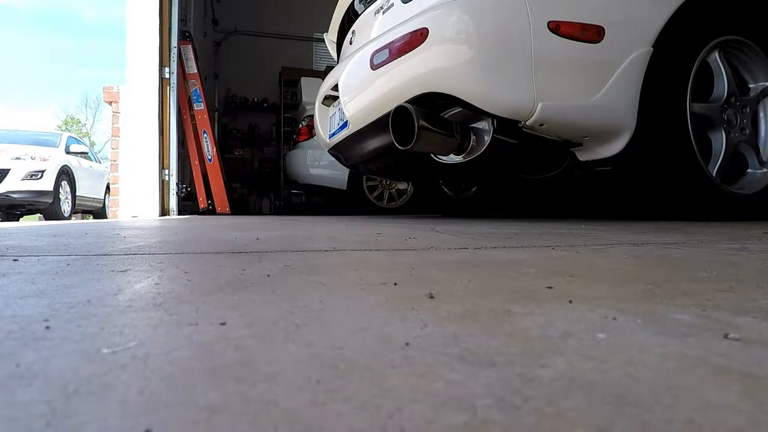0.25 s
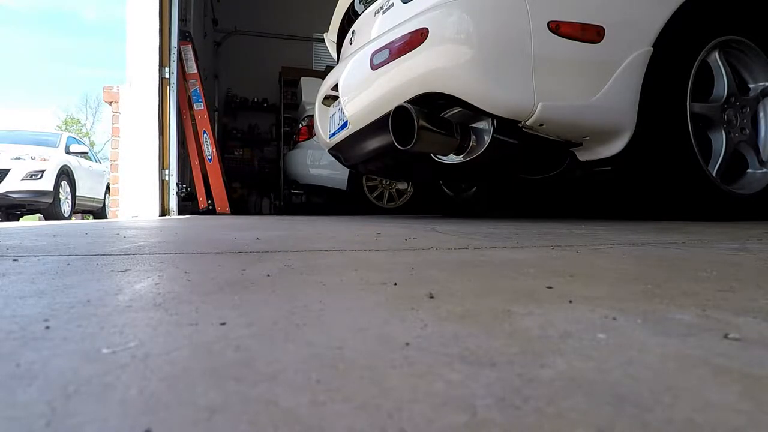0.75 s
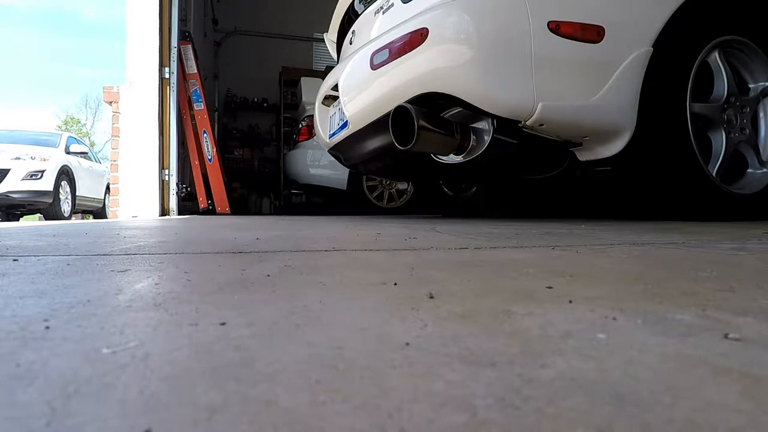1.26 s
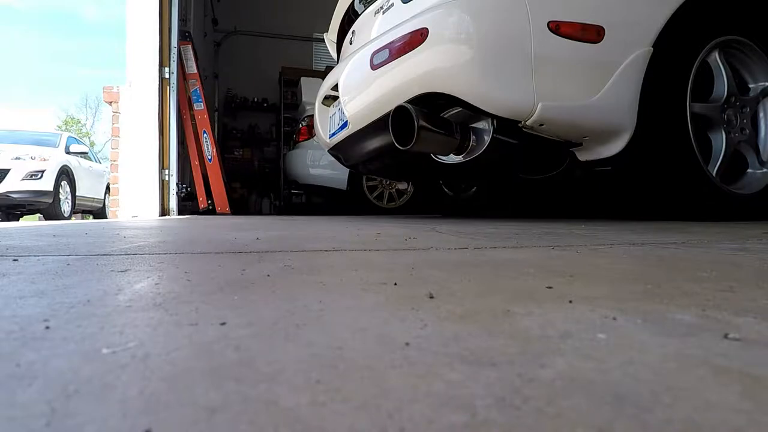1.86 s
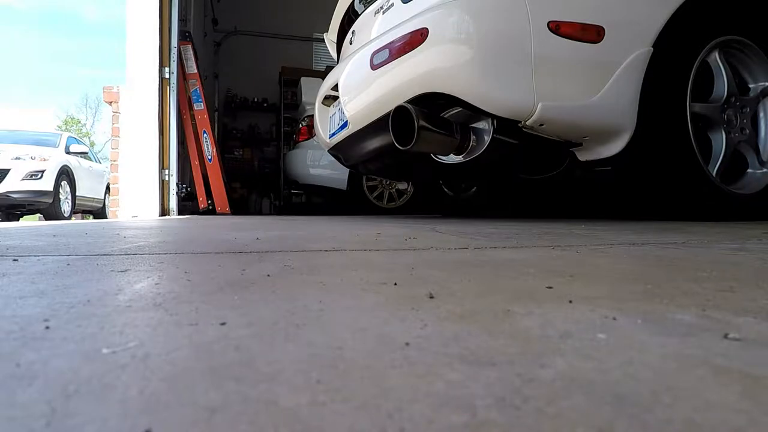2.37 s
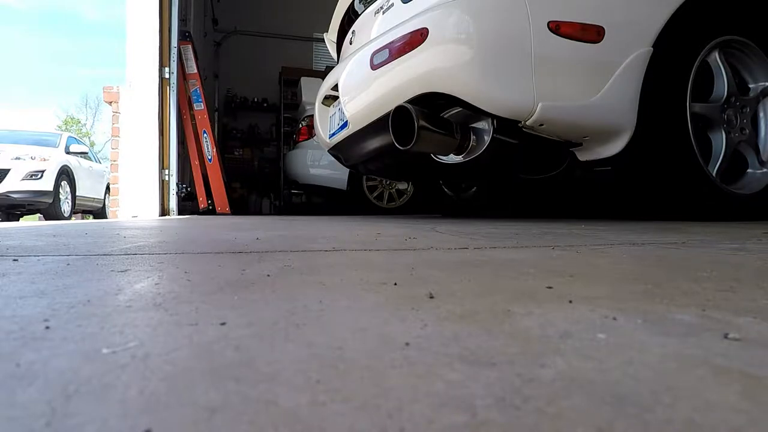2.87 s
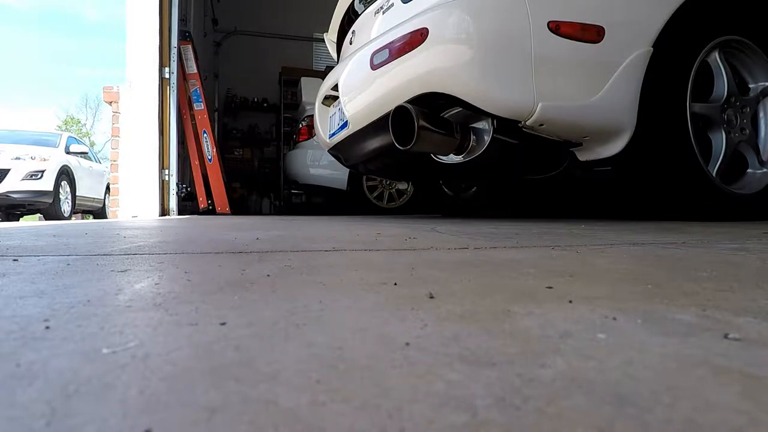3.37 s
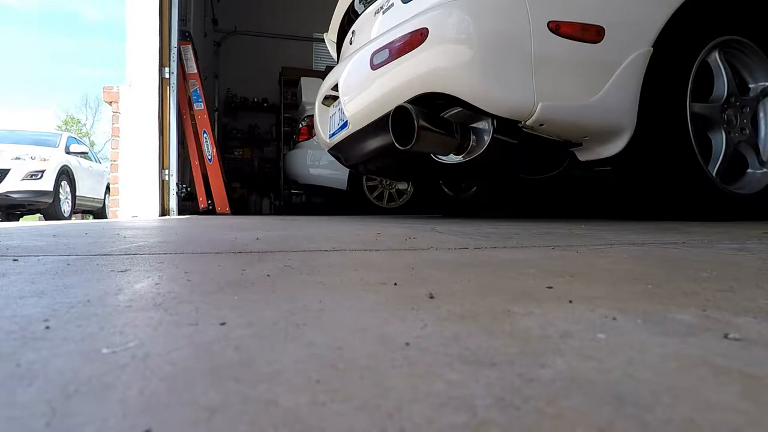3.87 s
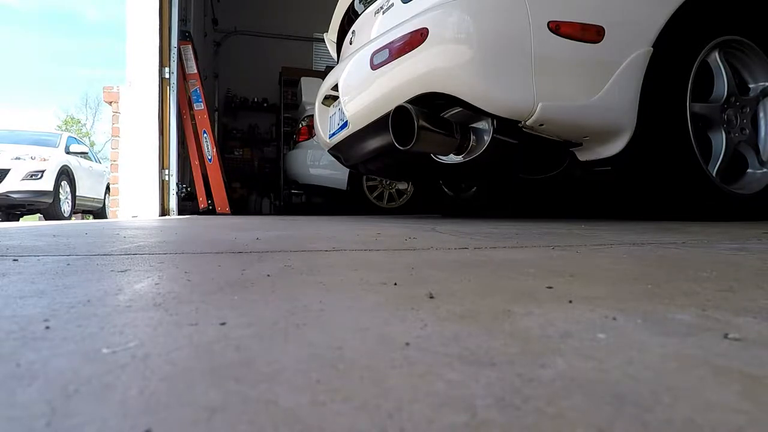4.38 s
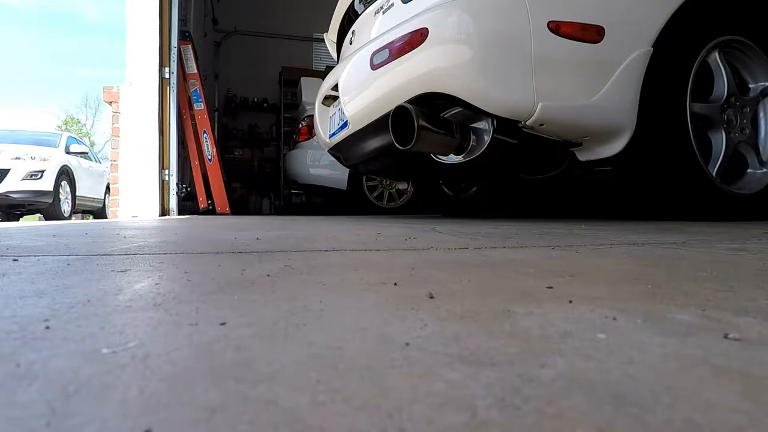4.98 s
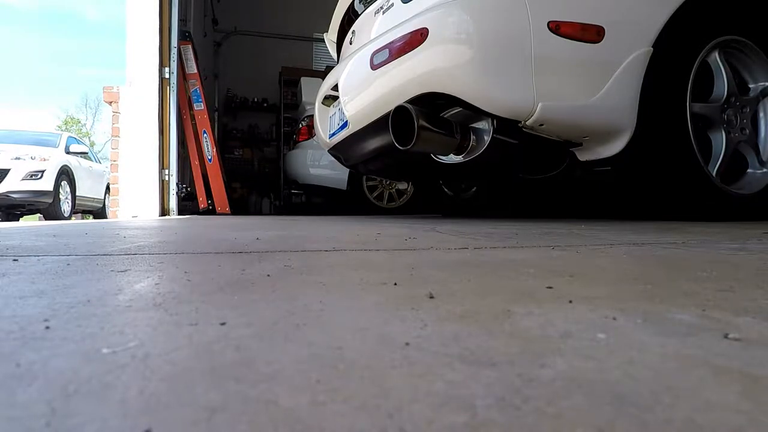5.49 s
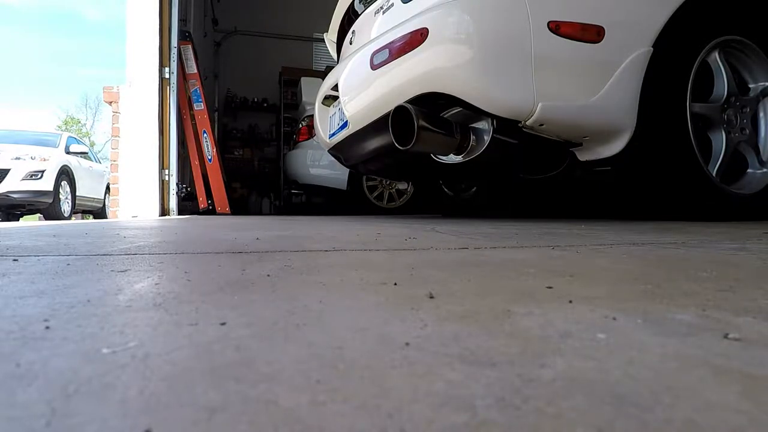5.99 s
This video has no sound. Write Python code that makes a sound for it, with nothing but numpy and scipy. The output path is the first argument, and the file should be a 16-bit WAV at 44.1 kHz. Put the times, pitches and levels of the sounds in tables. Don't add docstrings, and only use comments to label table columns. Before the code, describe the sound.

Low microphone behind a car exhaust inside a garage: bassy, loping idle with soft gas hiss above. Two short revs swell into a faster buzzing drone, each dropping away in sputtering, hollow burbles as fuel cuts. Small pops follow the first; the second, stronger rev breaks into a hard backfire crack and a deep thump before rough idle returns. Close, loud, lightly echoing.

```python
import sys
import numpy as np
from scipy import signal
from scipy.fft import rfft, irfft
from scipy.io import wavfile
from scipy.ndimage import uniform_filter1d

SR = 44100
rng = np.random.default_rng(int(sys.argv[2]) if len(sys.argv) > 2 else 0)


def transcribe(signal):
    frames = np.atleast_2d(signal).T
    limited = np.clip(frames, -1, 1)
    pcm = np.round(limited * 32767).astype(np.int16)
    wavfile.write(sys.argv[1], SR, pcm)


def elevation(decibels):
    levels = np.asarray(decibels, float)
    return 10 ** (levels / 20)


N = 275184
LEAD_IN = 8192
IDLE_HZ = 47.5

# time in seconds, firings per second.
FIRING_RATE = [(0, 43.3), (.43, 44), (.69, 67.6), (1.0, 82.2), (1.57, 61.5), (1.77, 59.8), (2.1, 50.8),
               (2.75, 45.2), (3.76, 43), (4.19, 69.6), (4.5, 86.2), (4.74, 92), (4.85, 80.5), (5.11, 77.6),
               (5.33, 62.3), (5.5, 59.6), (5.68, 52.2), (6.24, 46.5)]
# time in seconds, exhaust level in dB, gas flow level in dB.
FLOW = [(0.0, -13, -44.5), (0.42, -15, -43), (0.62, -11.5, -41), (0.9, -13.5, -40.5), (1.27, -13.5, -37.5),
        (1.6, -12, -40.5), (2.1, -15, -46), (2.9, -15.5, -45.5), (3.72, -14.5, -44.5), (4.08, -12.5, -41.5),
        (4.3, -13, -40.5), (4.7, -15, -36), (4.9, -11, -37), (5.08, -18, -39.5), (5.27, -17.5, -45.5),
        (5.55, -15, -46.5), (5.9, -17, -47.5), (6.24, -16, -45.5)]
# time in seconds, depth in dB, length in ms.
MISFIRES = [(0.743, -1.5, 10), (1.096, -20, 33), (1.15, -5, 12), (1.227, -6, 70), (1.283, -12.5, 13),
            (1.401, -2.5, 95), (1.456, 0, 15), (1.652, -9.5, 13), (1.981, -7.5, 11), (2.074, -1, 24.6),
            (2.449, -5.5, 24), (2.516, -14.5, 3.9), (2.647, 1, 44), (3.223, -17, 39), (4.329, -1.5, 31),
            (4.564, -12.5, 16), (4.88, -6.5, 60), (4.997, -3, 110), (5.086, -8, 6.7), (5.57, -1, 12),
            (5.718, -2, 26), (5.989, -5, 14), (6.125, -1.5, 61)]
# time in seconds, peak in dB, push in Hz (its
# sign is the # polarity), crack level in dB.
POPS = [
    (.001, -6, 260, -60),
    (.787, -12, 130, -29),
    (1.126, -6, -100, -20.5),
    (1.996, -7, -150, -31),
    (4.8334, 2, 260, -9),
    (4.895, -17, 200, -33),
    (4.9495, -.5, -105, -24),
]
# start in seconds, end in seconds, length of the first stutter in seconds.
FUEL_CUTS = [
    (1.029, 2.145, .42),
    (4.774, 5.577, 0.35),
]
# time in seconds, length in seconds, share that burns 0-1.
RELIGHTS = [
    (1.12, 0.06, 1),
    (1.25, 0.07, 0.7),
    (1.43, .05, 1),
    (1.68, 0.071, 1),
    (1.86, 0.042, 1),
    (2.0, 0.068, 1),
    (4.97, 0.1, 0.9),
    (5.42, 0.064, 0.98),
]
# time in seconds, length in seconds, added unevenness 0-1.
STUMBLES = [
    (.2, .12, .13),
    (.79, .04, .3),
    (1.95, .15, .3),
    (2.3, .2, .17),
    (2.76, .14, .33),
    (3.45, .12, .13),
    (4.35, .1, .18),
    (5.77, .15, .33),
    (6.2, .08, .2),
]
# frequency in Hz, level in dB.
PUFF_SPECTRUM = [(12, -65.5), (20, -32), (38, 15), (48, 11.5), (65, 12), (97, 13.5), (126, 14.5),
                 (150, -15.5), (200, -58), (330, -120)]
# frequency in Hz, level in dB.
FRONT_SPECTRUM = [(76, -23), (130, 4), (151, -1), (205, 7.5), (242, -3), (280, 2), (311, -0.5), (361, -23),
                  (398, -25), (440, -30), (475, -20), (524, -34), (700, -33), (910, -58.5), (1540, -120)]
# frequency in Hz, level in dB per Hz.
ROAR_SPECTRUM = [(250, -32), (420, 3.5), (439, -9.5), (541, -6.5), (605, -7), (667, -9.5), (724, -11),
                 (1120, -12), (1610, -12.5), (2500, -26), (3250, -47.5), (5500, -120)]
# frequency in Hz, level in dB per Hz.
HISS_SPECTRUM = [(1180, -4), (2000, -4.5), (2620, -3), (3070, -7.5), (5670, -7.5), (7590, -2.5),
                 (8270, -9.5), (9810, -15.5), (11000, -26), (14300, -46), (22000, -120)]
# frequency in Hz, level in dB per Hz.
AIR_SPECTRUM = [(6000, -18.5), (10200, -2.5), (11500, -8.5), (13400, -8.5), (14200, -14), (14800, -24)]
# frequency in Hz, level in dB per Hz.
CRACK_SPECTRUM = [(240, -16), (370, -3), (780, -7), (1490, -15), (2440, -17), (3230, -27), (3560, -25),
                  (4920, -27), (5430, -31), (7100, -31), (13000, -53)]
# frequency in Hz, width in Hz, level in dB.
SHELL_MODES = [(405.7, 32.4, 3.5), (457.2, 27, -1), (514.7, 18, -6.5), (600, 11, -7.5), (746, 24, -11.5),
               (1580, 38, -20.5)]
# frequency in Hz, likeness -1 to 1.
PORT_LIKENESS = [(60, 0.99), (130, 0.99), (290, 0.99), (630, 0.81), (1370, 0.17), (3010, 0.35),
                 (6570, 0.01), (14400, -0.05)]
# frequency in Hz, left over right in dB.
PORT_LEAN = [(60, 0.0), (150, -0.5), (370, -0.5), (930, -5.5), (2320, -3.0), (5770, -2.5), (14400, -1.5)]
# frequency in Hz, lead in radians.
PORT_LEAD = [(0, 0), (690, -0.2), (1210, 1.4), (2070, 1.2), (3450, 0.1), (11000, -3.9), (13600, 5.9),
             (14600, 7.1)]
LUCK = np.clip(rng.standard_normal((700, 3)), -2, 2)


def evened(x, span_s=None):
    power = np.mean(x ** 2) if span_s is None else uniform_filter1d(x ** 2, int(span_s * SR), mode="reflect")
    return x / np.sqrt(abs(power) + 1e-20)


def read(points, hz):
    f, value = np.transpose(points)
    return np.interp(np.log(hz + 1), np.log(f + 1), value)


def curves(rows):
    s, *columns = np.transpose(rows)
    return [np.interp(np.arange(N) / SR, s, c) for c in columns]


def bumps(rows):
    t = np.arange(0, N + 64, 64) / SR
    coarse = sum(height * np.exp(-((t - s) / length) ** 2) for s, length, height in rows)
    return np.interp(np.arange(N) / SR, t, coarse)


def with_lead_in(x):
    return np.pad(x, (LEAD_IN, 0), "edge")


def flickering(x, span):
    return evened(uniform_filter1d(uniform_filter1d(x, span), span))


def coloured(x, points, size=16384):
    level_db = read(points, abs(np.fft.fftfreq(size, 1 / SR)))
    log_gain = np.log(elevation(np.maximum(level_db, -100)))
    taps = np.fft.ifft(np.exp(np.conj(signal.hilbert(log_gain)))).real[:size // 2]
    return signal.oaconvolve(x, taps)[:len(x)]


def resonate(x, hz, *widths):
    turn = np.exp(2j * np.pi * np.cumsum(hz * np.ones(len(x))) / SR)
    for width in widths:
        r = np.exp(-np.pi * width / SR)
        x = 2 * (turn * signal.lfilter([1 - r], [1, -r], x / turn)).real
    return x


def ports(x, other):
    hz = np.fft.rfftfreq(N, 1 / SR)
    same = np.clip(read(PORT_LIKENESS, hz), 0, 1)
    lean = elevation(read(PORT_LEAN, hz) / 2)
    turn = np.exp(.5j * read(PORT_LEAD, hz))
    a, b = rfft(x), rfft(other)
    left = a * lean * turn
    right = (same * a + np.sqrt(1 - same ** 2) * b) / lean / turn
    return irfft(np.array([left, right]), N)


def eased(x):
    return uniform_filter1d(x * 1., int(.04 * SR), mode="nearest")


def running():
    t, hz = np.arange(N) / SR, curves(FIRING_RATE)[0]
    throttle = eased(np.clip(np.gradient(hz) * SR / 88, 0, 1))
    cut = sum(eased((t > a) & (t < b)) for a, b, _ in FUEL_CUTS)
    stutter = sum(eased((t > a + .04) & (t < a + s)) for a, _, s in FUEL_CUTS)
    burning = np.clip(1 - cut * (1 - bumps(RELIGHTS)), 0, 1)
    idle, wide_open = .25, .09
    uneven = idle + (wide_open - idle) * throttle
    uneven = (1 - cut) * uneven + .1 * cut + .52 * stutter + bumps(STUMBLES)
    fast = .84 * np.clip((hz - 62) / (79 - 62), 0, 1)
    pumping = np.clip(burning * fast + (1 - burning), 0, 1)
    return throttle, burning, uneven, pumping


def firings(own, spread_db):
    hz, uneven = with_lead_in(curves(FIRING_RATE)[0]), with_lead_in(running()[2])
    turns = np.cumsum(hz) / SR
    k = np.arange(1, int(turns[-1]))
    timing, strength, apart = LUCK[k].T
    sample = np.arange(len(hz))
    at = np.interp(k, turns, sample).astype(int)
    uneven = np.clip(uneven[at], 0, 1)
    late = uneven * (.1 * timing + .22 * own * apart)
    at = np.interp(k + late, turns, sample).astype(int)
    burn = np.minimum(np.sqrt(1 - own ** 2) * strength + own * apart, .4)
    swing_db = (.6 + .1351 * (hz[at] - IDLE_HZ)) * (-1.) ** k
    clicks = np.zeros(len(hz))
    clicks[at] = elevation(swing_db + spread_db * uneven * burn)
    return clicks


def puffs(eddies):
    *_, uneven, pumping = running()
    hz = curves(FIRING_RATE)[0]
    boom = coloured(firings(own=.85, spread_db=9) + .6 * eddies, PUFF_SPECTRUM)
    boom = -np.roll(boom, int(-.0024 * SR))[LEAD_IN:]
    hum = evened(resonate(boom, hz, 107, 58), span_s=.53)
    surge = evened(resonate(rng.standard_normal(N), .9 * hz, 14, 28))
    mix = (1 - pumping) * evened(boom, span_s=.052) + pumping * hum + 1.7 * uneven ** 2 * surge
    return evened(mix, span_s=.44)


def fronts(eddies):
    burning = running()[1]
    sharp = coloured(firings(own=.1, spread_db=13) + eddies, FRONT_SPECTRUM)
    sharp = evened(sharp, span_s=.12)[LEAD_IN:]
    dull = evened(resonate(sharp, 179.6, 127, 127), span_s=.28)
    return sharp + .6 * (1 - burning) * (dull - sharp)


def exhaust():
    throttle, burning, uneven, _ = running()
    puff_db = curves(FLOW)[0]
    front_db = puff_db - 4 + throttle - 8 * (1 - burning)
    gaps = [(s, .0004 * ms, np.clip(2.15 * db, -12, 0)) for s, db, ms in MISFIRES]
    stalls = [(s, .009, -9) for s, *_ in POPS]
    hole_db = bumps(gaps + stalls)
    eddies = .03 * with_lead_in(uneven) * rng.standard_normal(N + LEAD_IN)
    pipe = elevation(puff_db + hole_db + 1.5) * puffs(eddies) + elevation(front_db + .38 * hole_db) * fronts(eddies)
    pipe = pipe + elevation(-17.5) * np.roll(pipe, int(.01151 * SR))
    wall = elevation(-22.5) * signal.hilbert(np.roll(pipe, int(.02966 * SR))).imag
    return np.array([pipe * elevation(1.48) + wall, pipe * elevation(1.73) - wall])


def rasp():
    throttle, burning, *_ = running()
    clicks = firings(own=.35, spread_db=14.5)[LEAD_IN:]
    ring = 0
    for hz, width, db in SHELL_MODES:
        tilt_db = 10 * throttle * np.clip(np.log2(hz / 480), -.5, .5)
        ring = ring + elevation(db + tilt_db) * evened(resonate(clicks, hz, width, 3 * width))
    ring_db = curves(FLOW)[0] - 33 + .376 * (curves(FIRING_RATE)[0] - IDLE_HZ)
    ring_db = ring_db - 11 * (1 - burning) + 2 * throttle
    return evened(ring, span_s=.28) * elevation(ring_db + np.array([[-1.7], [1.7]]))


def gas():
    firing_hz, hiss_db = curves(FIRING_RATE)[0], curves(FLOW)[1]
    lag = 1 / (.43 * SR)
    unburnt = signal.lfilter([lag], [1, lag - 1], 1 - running()[1])
    roar_db = -9.5 + .72 * hiss_db - 2 * unburnt
    air_db = -57 - .1431 * (firing_hz - IDLE_HZ) - 19 * unburnt
    throb = np.cos(2 * np.pi * (np.cumsum(firing_hz) / SR - .15))
    flicker = flickering(rng.standard_normal(N), 300)
    sides = []
    for _ in range(2):
        roar, hiss, air = rng.standard_normal((3, N))
        roar = elevation(roar_db + .7 * throb + flicker) * evened(coloured(roar, ROAR_SPECTRUM))
        hiss = elevation(hiss_db + .33 * throb + .47 * flicker) * evened(coloured(hiss, HISS_SPECTRUM))
        air = elevation(air_db) * evened(coloured(air, AIR_SPECTRUM))
        sides.append(roar + hiss + air)
    return ports(*sides)


def patchy_treble(x):
    hz, t, z = signal.stft(x, SR, nperseg=2048)
    patches = uniform_filter1d(rng.standard_normal(z.shape[1:]), 5, 0)
    patches = evened(uniform_filter1d(patches, 3, 1))
    threshold = np.interp(hz, [8500, 10500, 12000, 14500], [-3, -1.2, -.3, .3])
    kept = patches > threshold[:, None]
    return signal.istft(z * np.maximum(kept, .03), SR, nperseg=2048)[1][:, :N]


def afterfire():
    t, push, bursts = np.arange(N) / SR, np.zeros(N), np.zeros(N)
    for s, db, hz, crack_db in POPS:
        u = t - s
        push -= elevation(db) * np.sin(2 * np.pi * hz * u) * np.exp(-(u * hz / .5) ** 2)
        crack_s = .0036 / np.sqrt(abs(hz) / 150)
        bursts += elevation(crack_db) * np.exp(-(u / crack_s) ** 2)
    crack = [bursts * evened(coloured(n, CRACK_SPECTRUM)) for n in rng.standard_normal((2, N))]
    return push + ports(*crack)


def burble():
    t, tail = np.arange(N) / SR, np.zeros(N)
    for s, *_, crack_db in POPS:
        tail += elevation(crack_db - 25) * (t > s) * np.exp(-np.maximum(t - s, 0) / .14)
    flicker, *noise = rng.standard_normal((3, N))
    tail = tail * elevation(2.5 * flickering(flicker, 150))
    return ports(*(tail * evened(resonate(n, 850, 450, 1100)) for n in noise))


def scene():
    return exhaust() + rasp() + patchy_treble(gas()) + afterfire() + burble()


def knee(x):
    return x / (1 + abs(x / .98) ** 6) ** (1 / 6)


def top_cut(x):
    return signal.sosfilt(signal.butter(12, 14980, fs=SR, output="sos"), x)


def record(dry):
    t, dip_db = np.arange(N) / SR, np.zeros(N)
    for s, *_, crack_db in POPS:
        u = np.maximum(t - s - .003, 0)
        depth_db = .67 * max(crack_db + 22, 0)
        dip_db -= depth_db * (1 - np.exp(-u / .003)) * np.exp(-u / .13)
    mix = knee(dry * elevation(dip_db))
    return top_cut(mix)


dry = scene()
out = record(dry)
transcribe(out)
```